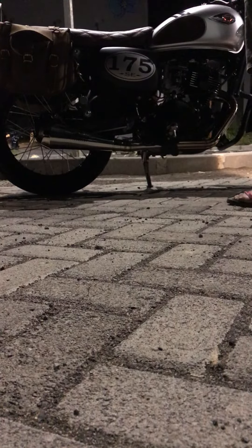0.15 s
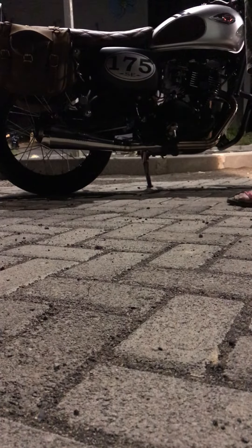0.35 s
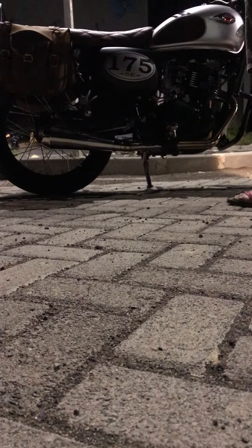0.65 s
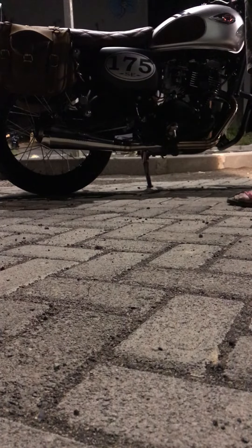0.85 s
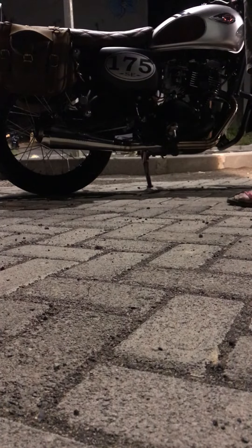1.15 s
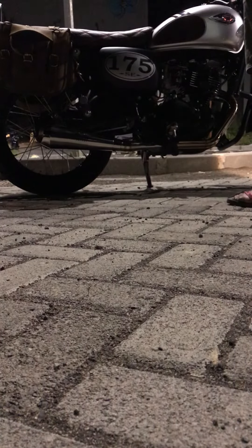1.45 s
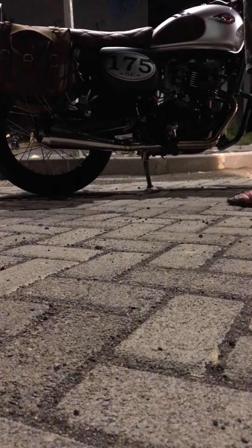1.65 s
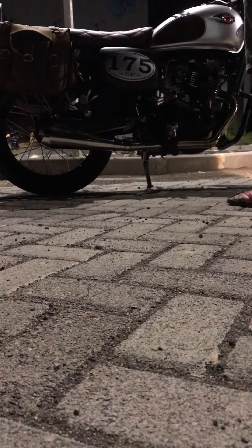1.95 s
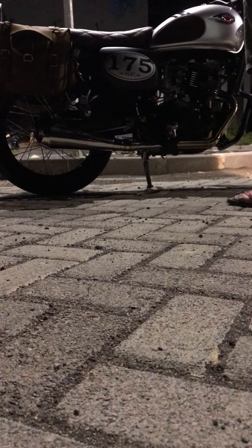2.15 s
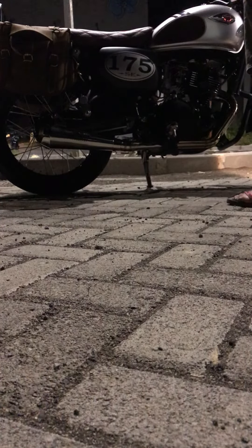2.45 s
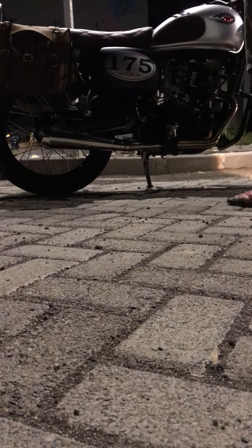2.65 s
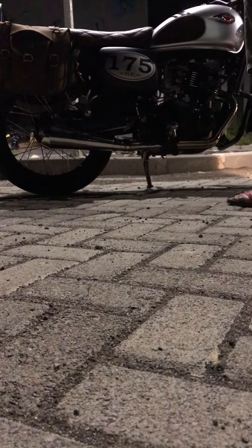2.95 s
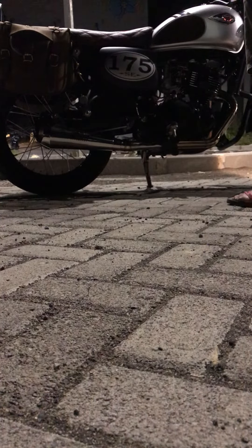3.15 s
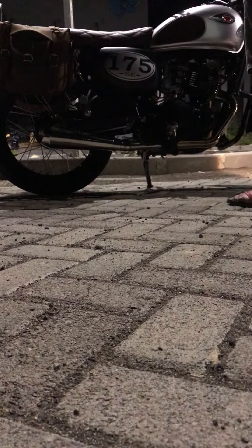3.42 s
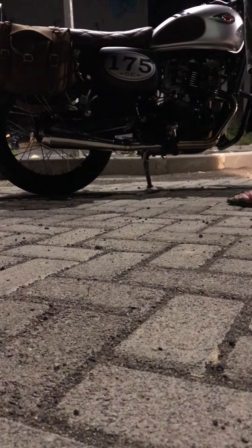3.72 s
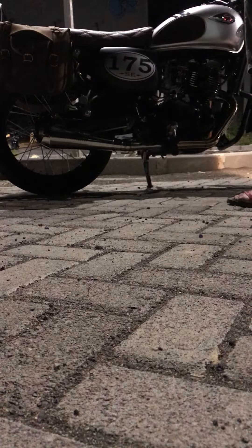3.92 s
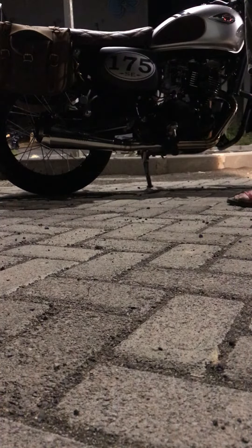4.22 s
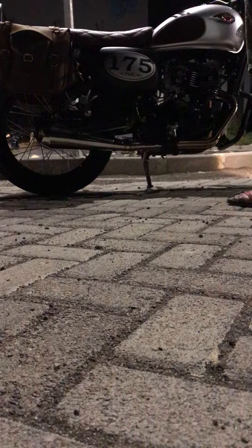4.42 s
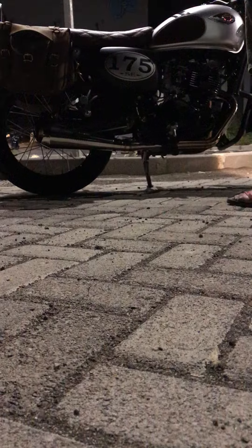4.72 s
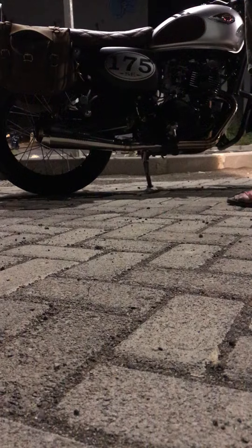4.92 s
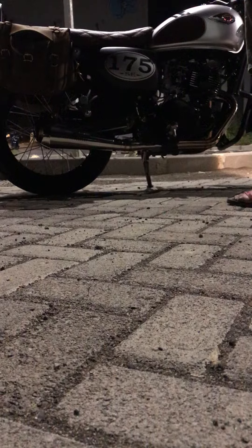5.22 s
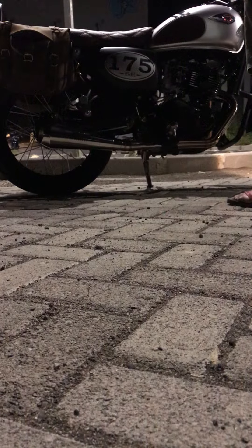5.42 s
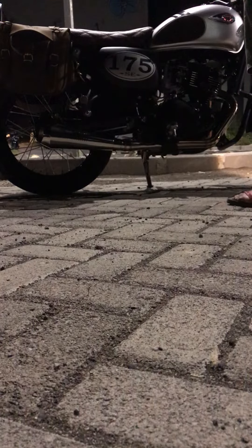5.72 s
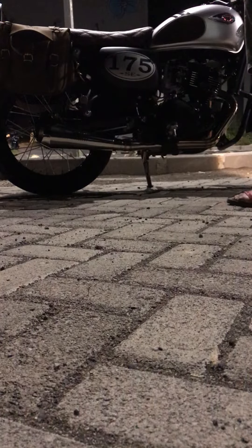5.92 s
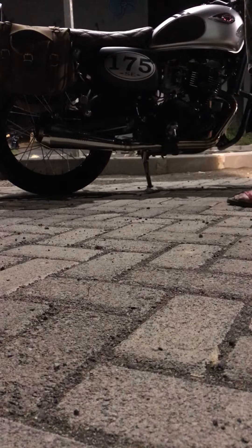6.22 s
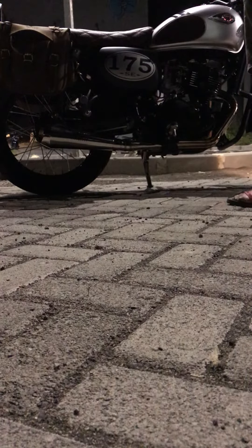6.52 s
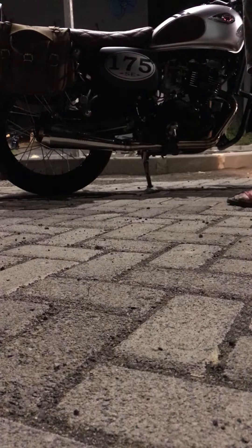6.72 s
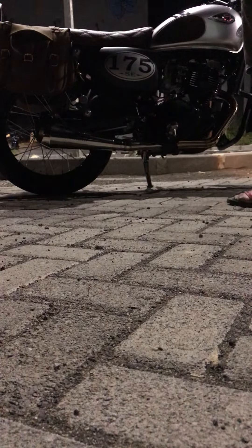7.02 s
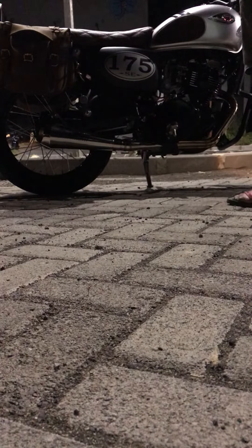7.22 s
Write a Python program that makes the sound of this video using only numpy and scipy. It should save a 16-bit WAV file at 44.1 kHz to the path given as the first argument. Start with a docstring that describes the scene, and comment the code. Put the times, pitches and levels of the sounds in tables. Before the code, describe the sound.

A single-cylinder motorcycle idles, is blipped twice, revved once more, then sinks to a slow, stumbling idle.

```python
"""A single-cylinder four-stroke motorcycle, standing on paving a few steps from one microphone.
It idles, is blipped twice, revved up once more, then sinks to a stumbling, slow idle.
Each firing is a pop that rings in the silencer, with a bark and a puff of hiss at the outlet.
Beneath it the air box gulps, valves tick, casings clatter and gears whine.
Farther off, kerb and house fronts send a faint tail back to the microphone."""
import sys
import numpy as np
from scipy import signal
from scipy.fft import rfft, irfft, next_fast_len
from scipy.io import wavfile

SR = 44100
rng = np.random.default_rng(int(sys.argv[2]) if len(sys.argv) > 2 else 0)


def digitize_waveform(pressure):
    """Quantize a signal to 16-bit integers and store it at the path in sys.argv[1].

    Rows of a 2-D input are taken as channels; values are limited to [-1, 1].
    """
    field = np.atleast_2d(pressure).T
    bounded = np.clip(field, -1, 1)
    quanta = np.round(bounded * 32767).astype(np.int16)
    wavfile.write(sys.argv[1], SR, quanta)


N = 325017
TIME = np.arange(N) / SR


def exhaust(cycle, combustion, heat):
    """Pop, bark and hiss of every firing, as they reach the microphone from the tailpipe."""
    times, nearest, age_ms = firings(cycle)
    held = (np.interp(times, TIME, curve)[nearest] for curve in combustion)   # one value per firing
    pop_db, width_ms, boom_db, bark_db, hiss_db = held
    stretch, extra_db = late_burns(times, width_scatter=0.05)
    width_ms = np.maximum(width_ms * stretch[nearest], 0.2)
    burn_db = uneven_burns(times, scatter_db=1.0)[nearest]
    gust_db = rng.standard_normal(len(times))[nearest]
    boom = from_db(boom_db - 2.0 - 0.31 * burn_db)   # a weak firing still pumps, so its boom drops less
    bark_gain = from_db(bark_db + extra_db[nearest] + burn_db + gust_db + 22.5)
    hiss_gain = from_db(hiss_db + burn_db + gust_db + 7.5)
    low = pops(age_ms + 2.263 * width_ms, width_ms, from_db(pop_db + burn_db), boom, heat)
    middle = bark(age_ms + 0.92, bark_gain, front_ms=0.49 * width_ms, wake_share=0.2)
    top = hiss(age_ms, hiss_gain, lead_ms=1.86, tail_db=-11.5)
    return low + middle + top


def firings(cycle):
    """Time of every firing; for each sample the nearest firing and the ms since it (negative before)."""
    times = np.interp(np.arange(1, int(cycle[-1]) + 1), cycle, TIME)
    nearest = np.searchsorted((times[1:] + times[:-1]) / 2, TIME)
    age_ms = (TIME - times[nearest]) * 1000
    return times, nearest, age_ms


# firings that burn poorly: (time [s], level [dB re a normal firing])
POOR_BURNS = [(1.35, -5), (1.53, -21), (1.616, -5), (1.845, -7), (1.957, -14), (2.206, -5), (2.869, -6),
              (3.016, -9), (3.097, -6.5), (3.14, -10), (3.184, -10.5), (3.277, -1.5), (3.375, -10.5),
              (3.479, -4), (5.125, -6), (5.459, -8), (5.85, -9.5), (5.89, -7), (5.934, -8.5), (6.032, -19),
              (6.137, -11), (6.251, -9.5), (6.381, -8.5), (6.532, -14), (6.713, -18.5), (6.921, -3.5)]
def uneven_burns(times, scatter_db):
    """Level of each firing in dB: no two burn alike, and a few hardly catch."""
    level_db = scatter_db * rng.standard_normal(len(times))
    for time, drop_db in POOR_BURNS:
        level_db[np.argmin(abs(times - time))] += drop_db
    return level_db


# late burns in the pipe: (time [s], pop width [factor], change of bark [dB])
LATE_BURNS = [(1.589, 1.4, 7.5), (1.649, 1.45, 10), (1.744, 1.6, 11), (5.491, 1.42, 8), (5.692, 1.38, 11),
              (5.766, 1.5, -4)]
def late_burns(times, width_scatter):
    """Pops vary a little in width; on the overrun, fuel burning late makes a few fatter, most rougher."""
    stretch = np.exp(width_scatter * rng.standard_normal(len(times)))
    extra_db = np.zeros(len(times))
    for time, wider, bark_db in LATE_BURNS:
        firing = np.argmin(abs(times - time))
        stretch[firing], extra_db[firing] = wider, bark_db
    return stretch, extra_db


def pops(age_ms, width_ms, strength, boom, heat):
    """A slug of gas radiates the slope of its flow; in hotter gas the silencer rings faster."""
    whole = age_ms / width_ms
    core = whole / 0.78   # the first rush through the valve is shorter than the whole slug
    slug = strength * (whole * np.exp(-whole ** 2 / 2) + 0.082 * core * np.exp(-core ** 2 / 2))
    gas_clock = np.cumsum(heat)   # heat is the speed of sound in the gas, re idle
    steps = np.arange(int(gas_clock[-1]) + 1)
    rung = silencer(np.interp(steps, gas_clock, slug), np.interp(steps, gas_clock, boom))
    return np.interp(gas_clock, steps, rung)


# reflections from the pipe's junction and open end, at idle heat: (delay [ms], share [factor])
PIPE_ECHOES = [(4.8, 0.15), (9.7, 0.3), (20.0, 0.039)]
# exhaust pipe resonances at idle heat: (frequency [Hz], width [Hz], level [dB])
PIPE_MODES = [(191.6, 29.7, -1), (221.2, 7.1, -9), (280, 14, -53), (353.3, 38, 3), (444, 38.3, 6)]
def silencer(slug, boom):
    """The slug sets the chamber booming, bounces along the pipe and rings its resonances."""
    chamber = slug + boom * resonance(slug, hz=86.9, width_hz=9)
    chamber = cut(chamber, hz=55.0, kind="high", order=3)
    returned = cut(chamber, hz=326, kind="low")   # only the lows turn back; the highs leave at once
    at = np.arange(len(slug))
    chamber += sum(share * np.interp(at - ms * SR / 1000, at, returned) for ms, share in PIPE_ECHOES)
    pipe = chamber + sum(from_db(db) * resonance(chamber, hz, width) for hz, width, db in PIPE_MODES)
    # a side cavity swallows one narrow band
    pipe = pipe - 0.5 * resonance(pipe, hz=409.0, width_hz=65.5)
    # the baffles hold back the lows, so that each pop sweeps downward
    return pipe - 2 * resonance(pipe, hz=160, width_hz=225)


# resonances of the silencer's outlet: (frequency [Hz], width [Hz], level [dB])
OUTLET_MODES = [(657, 206, 0.5), (858, 277, 1), (1050, 66, -6.5), (1410, 240, -2.5), (1620, 100, -8)]
def bark(age_ms, strength, front_ms, wake_share):
    """Under load the wave front steepens and, with its turbulent wake, rings the outlet."""
    front = np.exp(-(age_ms / front_ms) ** 2)
    wake = wake_share * rng.standard_normal(N) * burst(age_ms, rise_ms=1.0, fall_ms=3)
    drive = cut(strength * (wake + front), hz=1780, kind="low", order=8)
    ringing = sum(from_db(db) * resonance(drive, hz, width) for hz, width, db in OUTLET_MODES)
    return cut(ringing, hz=496, kind="high")


# gas jet at the outlet: (frequency [Hz], relative density [dB])
JET_SPECTRUM = [(1000, 13), (1900, -1), (2600, 2.5), (3500, -1), (4250, 7), (5000, 0.5), (6000, 5),
                (9000, -1), (13000, 4), (16000, -1)]
def hiss(age_ms, strength, lead_ms, tail_db):
    """The jet puffs just ahead of each firing and trails off."""
    puff = burst(age_ms + lead_ms, rise_ms=2.67, fall_ms=1.7)
    trail = from_db(tail_db) * burst(age_ms, rise_ms=5.3, fall_ms=12)
    return strength * (puff + trail) * cut(noise(JET_SPECTRUM), hz=1180, kind="high")


# twists of the grip: (opens [s], shuts [s], first opening [0-1], last opening [0-1])
THROTTLE_TWISTS = [(1.06, 1.314, 0.86, 0.71), (2.566, 2.826, 0.31, 0.39), (4.244, 4.947, 0.19, 0.48),
                   (4.875, 5.094, 0.54, 0.98)]
def throttle(open_s, shut_s):
    """Each twist opens quickly, is eased up or down, and snaps shut."""
    twists = [np.interp(TIME, [opens, opens + open_s, shuts, shuts + shut_s], [0, first, last, 0])
              for opens, shuts, first, last in THROTTLE_TWISTS]
    return np.max(twists, axis=0)


# fuel mixture, running lean after the long overrun: (time [s], added charge [dB])
FUEL_MIXTURE = [(0, 1), (2.1, 0.5), (2.45, -0.2), (3.0, 2), (3.9, 0.2), (4.2, 0.5), (5.85, 0.33),
                (6.1, -1.6), (6.55, -0.5), (6.85, -1.5), (7.37, -0.5)]
# the engine's voice at idle speed, from overrun through starved and idling to wide open; each level is
# relative within its column: (charge [dB re idle], pop [dB], pop width [ms], boom [dB], bark [dB],
# hiss [dB], speed of sound in the gas [re idle], clatter [dB], gear whine [dB])
VOICE_BY_CHARGE = [(-7, 0.5, 1.004, 16, -29.5, -43.5, 0.876, -46.5, -74),
                   (-6.5, -2.0, 0.98, 18, -36, -52, 0.844, -48, -48.5),
                   (-3, -11.5, 0.78, 22, -54.5, -54, 0.87, -51.5, -51),
                   (-4, -10, 0.75, 23, -48, -61, 0.963, -51, -51),
                   (-1, -1.5, 0.73, 17, -46, -47.5, 1.002, -46.5, -57),
                   (0.5, -1, .86, 17.5, -38.5, -41.5, 0.997, -44.5, -62),
                   (4, 0, 1.067, 13, -39, -36, 1.082, -43, -62),
                   (6, 1.5, 0.74, 13, -33, -39, 0.967, -44, -46),
                   (9.0, 0, 0.87, 19, -20.5, -29, 0.954, -43, -64)]
# change with each doubling of engine speed: (the columns above from pop on, in the same units)
VOICE_PER_OCTAVE = (-2, -0.02, -3, 4, 0.7, 0.2045, 2.5, -1.2)
def running_state(speed, idle_rate=17):
    """The charge each cycle draws, air flow over speed, sets the voice: shut and fast, it starves."""
    air_flow = 1 + 6.03 * throttle(open_s=0.055, shut_s=0.0434)   # in idle air flows
    charge_db = 20 * np.log10(air_flow * idle_rate / speed) + read(FUEL_MIXTURE, TIME)[0]
    octaves = np.log2(speed / idle_rate)
    voice = read(VOICE_BY_CHARGE, charge_db)
    return [value + slope * octaves for value, slope in zip(voice, VOICE_PER_OCTAVE)]


def intake(cycle, strength, place, length):
    """The air box gulps once a cycle; place and length are fractions of the cycle."""
    gulp = strength * np.exp(-((cycle % 1 - place) / length) ** 2)
    return cut(cut(gulp, hz=39.2, kind="high"), hz=134, kind="low")


# valve closings: (place in the cycle [0-1], relative level [dB])
VALVE_TICKS = [(0.204, 4), (0.378, -17), (0.877, 8)]
# rustle of the engine casings: (frequency [Hz], relative density [dB])
CASING_SPECTRUM = [(30, -48), (100, 10.5), (400, 16), (700, 8.5), (1000, 6.5), (1500, 5.5), (1950, -4.5),
                   (2550, -6.5), (3300, -7), (4300, -3), (5500, -9), (7200, -10), (10000, -13.5),
                   (16000, -21.5)]
# ringing of the cooling fins and covers: (frequency [Hz], width [Hz], relative level [dB])
FIN_MODES = [(2410, 64, -5), (2566, 96, 1), (3032, 32, -6), (3215, 30, -4.5), (3380, 40, -11),
             (4080, 41, -4), (4680, 61, -4), (6870, 37, -5), (7360, 35, -5), (8830, 68, -1.5)]
def machinery(cycle, clatter_db, tick_db, fin_db):
    """Chain and bearings rustle in the casings; the closing valves tick and set the fins ringing."""
    ticks = sum(from_db(db + tick_db) * np.exp(-((cycle - place) % 1) / 0.066)
                for place, db in VALVE_TICKS)
    shake = from_db(clatter_db) * (1 + ticks)
    knocks = shake * rng.standard_normal(N)
    fins = sum(from_db(db + fin_db) * resonance(knocks, hz, width) * np.sqrt(SR / (np.pi * width))
               for hz, width, db in FIN_MODES)
    return from_db(5) * shake * noise(CASING_SPECTRUM) + fins


# gear mesh tones: (frequency [multiple of the firing rate], relative level [dB])
MESH_TONES = [(38, 12.5), (48, 6), (60, 0), (96, 6)]
def gears(cycle, whine_db, flutter, cover_hz, cover_width_hz):
    """Gear mesh tones swell as they glide through a resonance of the engine cover."""
    wobble = flutter * rms_one(cut(rng.standard_normal(N), hz=40, kind="low"))
    mesh = sum(from_db(db) * np.sin(2 * np.pi * teeth * (cycle + wobble)) for teeth, db in MESH_TONES)
    return from_db(whine_db) * resonance(mesh, cover_hz, cover_width_hz)


def valve_clack(cycle, place, level_db, clack_hz, width_hz):
    """The rocker knocks in the head as the exhaust valve opens, just before each pop."""
    knock = rng.standard_normal(N) * np.exp(-((cycle - place) % 1) / 0.09)
    ringing = resonance(resonance(knock, clack_hz, width_hz), clack_hz, width_hz)
    return from_db(level_db) * rms_one(ringing)


def street(direct, echo_db, t60_s, wall_hz):
    """Kerb and house fronts scatter a faint, dull tail that reaches the microphone 12 ms late."""
    age = TIME[:SR // 2]
    tail = rng.standard_normal(len(age)) * from_db(-60 * age / t60_s) * (age > 0.012)
    tail = cut(cut(tail, wall_hz, kind="low"), hz=290, kind="high")
    tail /= np.sqrt(np.sum(tail ** 2))
    return direct + from_db(echo_db) * signal.fftconvolve(direct, tail)[:N]


def from_db(db):
    """Decibels to gain."""
    return 10 ** (np.asarray(db) / 20)


def rms_one(x):
    """Scale to unit rms."""
    return x / np.sqrt(np.mean(x ** 2) + 1e-20)


def read(rows, at):
    """A table's other columns, interpolated at the given values of its first."""
    first, *columns = np.transpose(rows)
    return [np.interp(at, first, column) for column in columns]


def resonance(x, hz, width_hz):
    """Two-pole resonance with gain 1 at its peak."""
    r = np.exp(-np.pi * width_hz / SR)
    poles = [1, -2 * r * np.cos(2 * np.pi * hz / SR), r * r]
    return signal.lfilter(np.array([1, 0, -1]) * (1 - r * r) / 2, poles, x + 1e-18)


def cut(x, hz, kind, order=2):
    """Butterworth high- or low-pass."""
    return signal.sosfilt(signal.butter(order, hz, kind, fs=SR, output="sos"), x)


def noise(spectrum):
    """Noise of the given colour, rms 1."""
    size = next_fast_len(N)
    hz, level_db = np.transpose(spectrum)
    bin_hz = np.arange(size // 2 + 1) * SR / size
    shape = from_db(np.interp(np.log(bin_hz + 1), np.log(hz), level_db))
    return rms_one(irfft(rfft(rng.standard_normal(size)) * shape, size)[:N])


def burst(age_ms, rise_ms, fall_ms):
    """A smooth rise up to age 0, then an exponential fall."""
    return np.exp(-(np.minimum(age_ms, 0) / rise_ms) ** 2 - np.maximum(age_ms, 0) / fall_ms)


def lagged(x, lag_s):
    """Follow x with a one-pole lag."""
    r = np.exp(-1 / (lag_s * SR))
    return x[0] + signal.lfilter([1 - r], [1, -r], x - x[0])


# engine speed: (time [s], rate [firings per s])
ENGINE_SPEED = [(0.0, 17.249), (0.622, 17.695), (0.978, 16.673), (1.094, 18.591), (1.294, 41.642),
                (1.978, 25.216), (2.554, 18.123), (2.794, 29.924), (3.224, 21.536), (3.57, 17.635),
                (4.11, 15.623), (4.35, 17.155), (4.626, 26.53), (4.861, 31.845), (5.042, 44.05),
                (5.243, 41.398), (5.317, 37.683), (5.615, 29.33), (5.992, 20.496), (6.722, 9.08),
                (6.867, 10.814), (6.987, 8.083), (7.029, 9.958), (7.37, 10.013)]
def scene():
    """The motorcycle from a few steps away: one cycle count drives exhaust, intake, valves and gears."""
    speed, = read(ENGINE_SPEED, TIME)
    cycle = 0.6515 + np.cumsum(speed) / SR
    pop_db, width_ms, boom_db, bark_db, hiss_db, heat, clatter_db, whine_db = running_state(speed)
    pipe_heat = lagged(heat, lag_s=0.033)   # the gas in the pipe takes time to warm and cool
    pipe = exhaust(cycle, (pop_db, width_ms, boom_db, bark_db, hiss_db), pipe_heat)
    air = intake(cycle, from_db(bark_db + 13.0), place=0.438, length=0.033)   # it grows with the bark
    rattle = machinery(cycle, clatter_db, tick_db=-2.5, fin_db=-13.5)
    whine = gears(cycle, whine_db, flutter=0.00093, cover_hz=1720, cover_width_hz=124)
    clack = valve_clack(cycle, place=0.77, level_db=-55.0, clack_hz=1430, width_hz=270)
    return street(pipe + air + rattle + whine + clack, echo_db=-34, t60_s=1.0, wall_hz=3500)[None]


def record(dry):
    """The microphone's mono channel: the tallest peaks are rounded off and the top is cut at 16.1 kHz."""
    rounded = dry / (1 + dry ** 8) ** (1 / 8)
    return signal.sosfilt(signal.ellip(10, 0.1, 80, 16100, fs=SR, output="sos"), rounded)


dry = scene()
out = record(dry)
digitize_waveform(out)
```